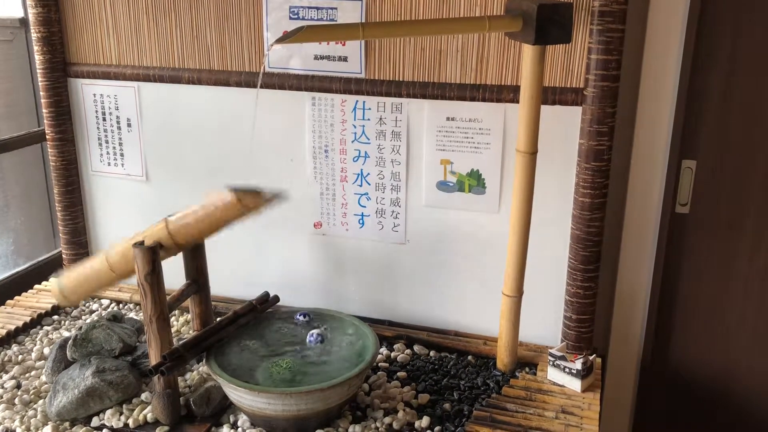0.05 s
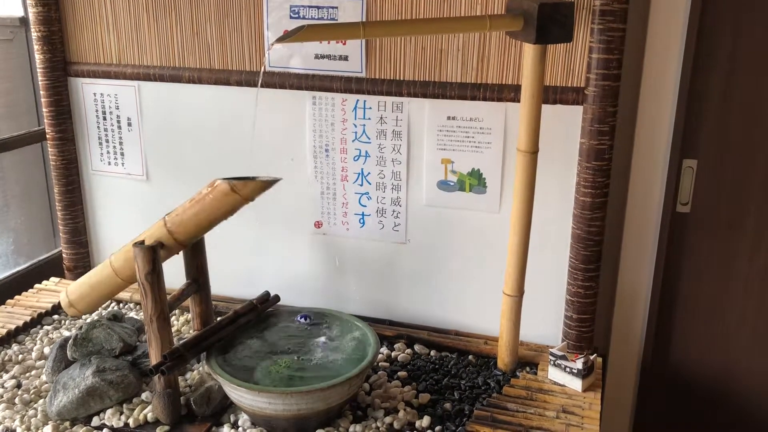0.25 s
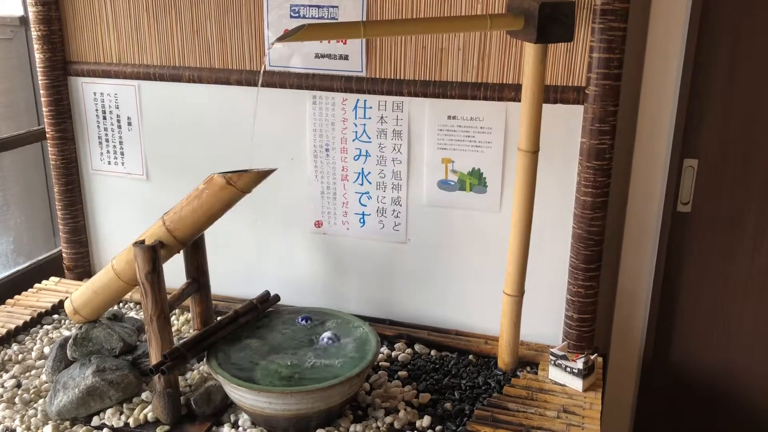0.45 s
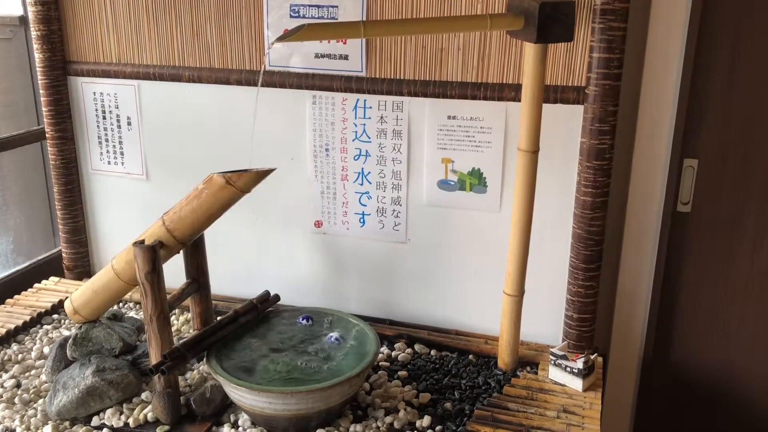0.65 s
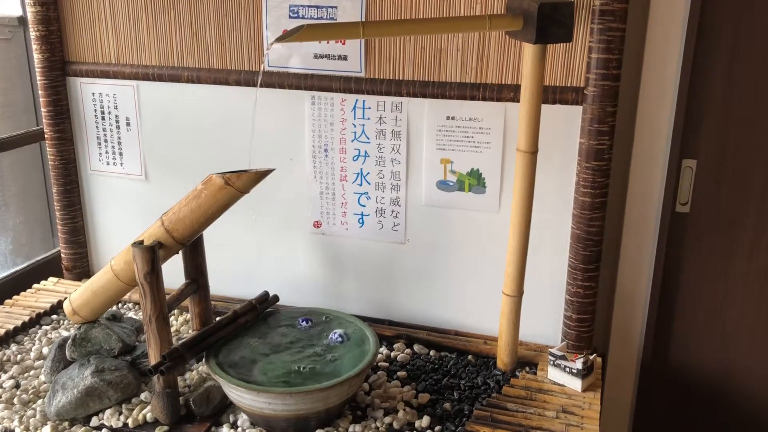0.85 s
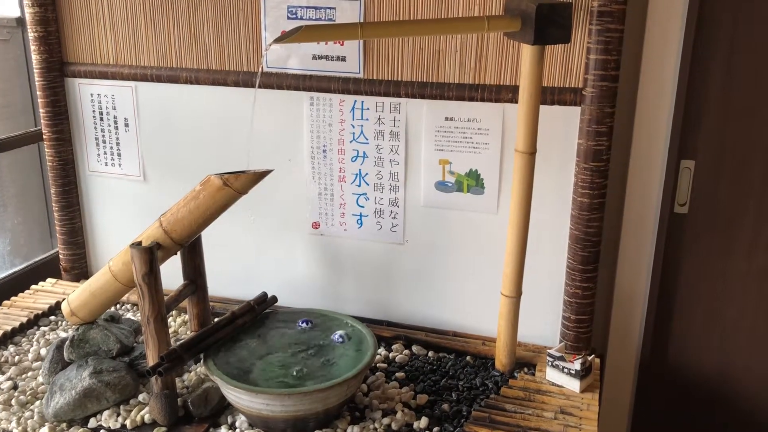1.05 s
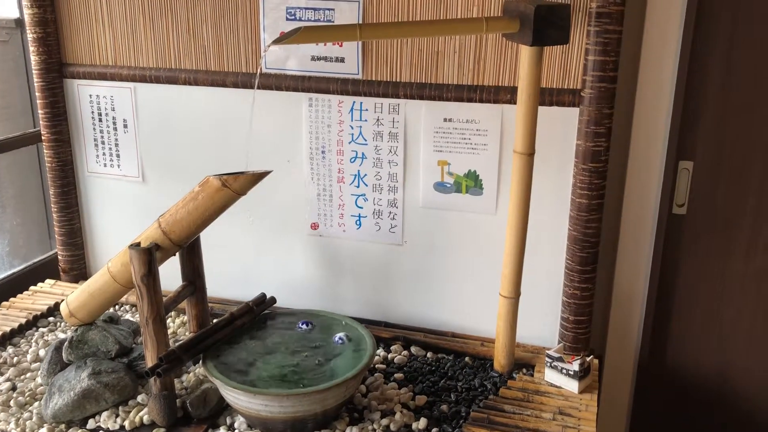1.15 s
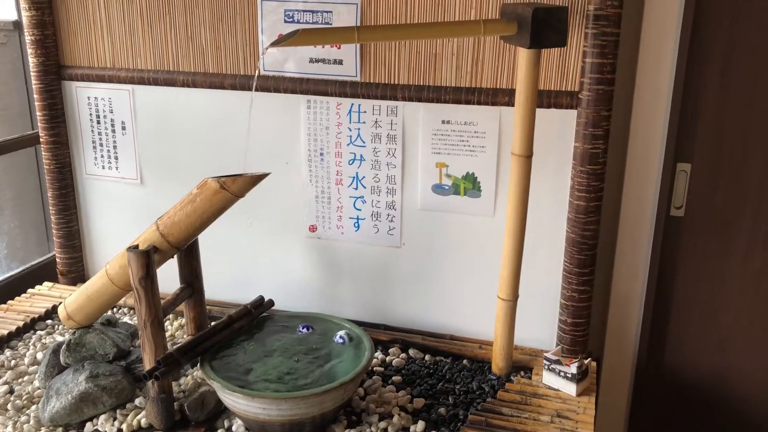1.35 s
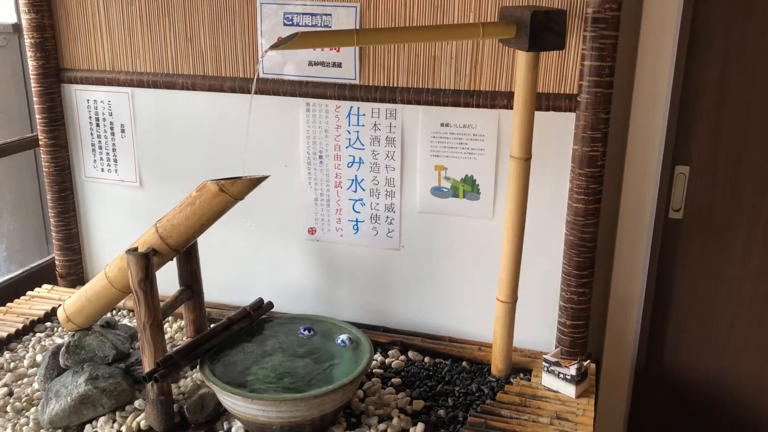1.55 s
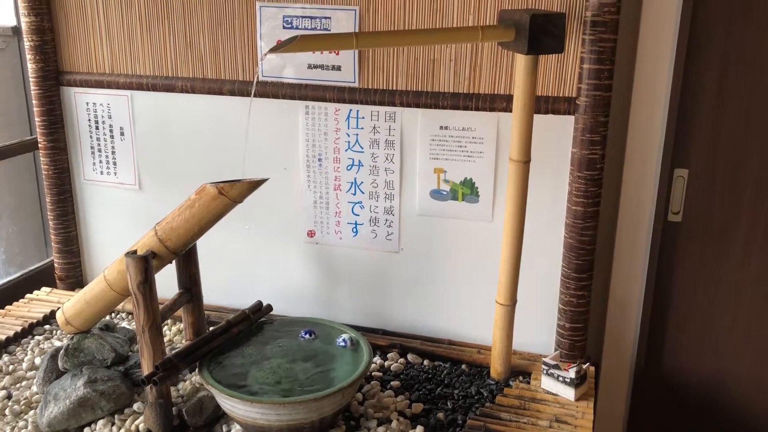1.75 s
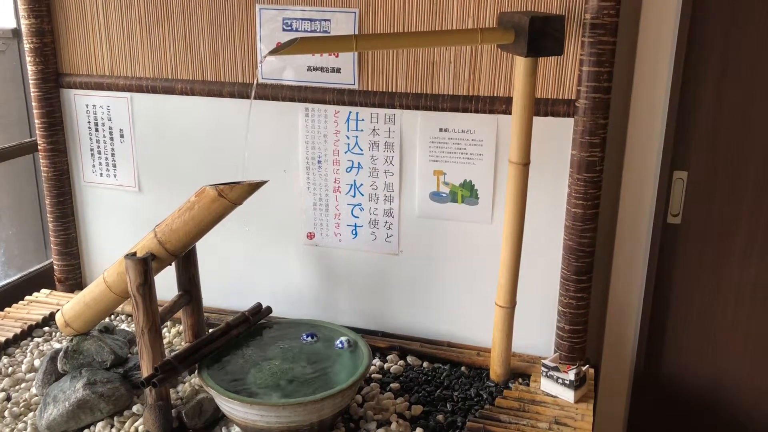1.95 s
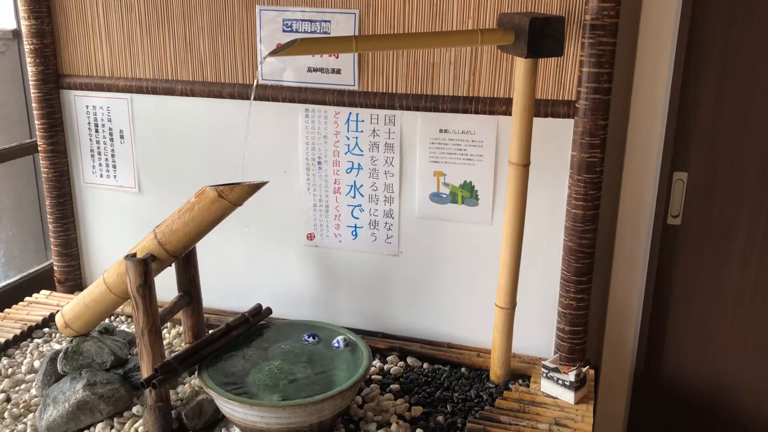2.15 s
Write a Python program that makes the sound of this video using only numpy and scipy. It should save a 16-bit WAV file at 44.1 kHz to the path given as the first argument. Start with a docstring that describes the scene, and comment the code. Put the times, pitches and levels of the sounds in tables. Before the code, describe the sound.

A bamboo water tipper swings back with a faint swish, knocks hard on stone and bounces once, softly. The hollow knock echoes briefly in a small porch, then a thin stream drips nearby over a low steady background.

```python
"""A few drips and a swish are heard first, as an emptied bamboo water tipper swings back. It knocks hard
on its stone and bounces once, softly. Each impact excites the damped modes of the tube and its air
column, a hollow ring that reverberates in a small hard-walled porch. A thin stream drips into tube and
basin, sounding through resonating bubbles, and late on one fat drop rings the bamboo.
A low steady background lies underneath; a limiter holds down the knock."""
import sys
import numpy as np
from scipy import signal
from scipy.fft import rfft, irfft
from scipy.io import wavfile
from scipy.ndimage import uniform_filter1d

SR = 44100
rng = np.random.default_rng(int(sys.argv[2]) if len(sys.argv) > 2 else 0)


def generate_wav(signal):
    """Clip the signal to [-1, 1] and save it as 16-bit WAV at the path in sys.argv[1]."""
    frames = np.transpose(np.atleast_2d(signal))
    scaled = np.clip(frames, -1, 1) * 32767
    pcm = np.round(scaled).astype(np.int16)
    wavfile.write(sys.argv[1], SR, pcm)


N = 97020

# spectrum of the steady background (frequency [Hz], relative spectral density [dB])
BACKGROUND_SPECTRUM = [(25, -20), (50, -12.5), (85, -3), (140, 3), (180, -7.5), (228, 5.5), (275, 0),
                       (350, -8), (650, -6.5), (850, -4), (915, 0.5), (990, -6.5), (1300, -9.5),
                       (2200, -14), (3200, -22.5), (5500, -34), (10000, -36.5), (16000, -35)]
# early reflections from the porch walls (delay [s], level [dB])
WALL_ECHOES = [(0.0204, -5), (0.0403, -6.5), (.0600, -7.5), (.0880, -7), (.108, -13)]
# reverberation time of the porch (frequency [Hz], t60 [s])
PORCH_DECAY = [(100, 0.9), (400, 0.56), (900, 0.66), (2000, 0.72), (4000, 0.65), (12000, 0.6)]
# fine spatter, dying down as the water settles (time [s], level [dB])
SPATTER_LEVELS = [(0, -47), (.2, -52), (.6, -58), (.85, -57.5), (1.1, -62.5), (1.5, -64), (2.2, -65)]
# distinct drops (time [s], level [dB], starting bubble frequency [Hz], t60 [s])
DROPS = [(.023, -43, 7250, 0.0086), (0.049, -39, 10000, 0.0095), (0.079, -33.5, 4160, 0.012),
         (.097, -33, 3890, 0.012), (0.699, -40, 1633, 0.048), (0.777, -35.5, 3800, 0.005),
         (0.7855, -34, 4720, 0.0072), (.802, -38.5, 3320, 0.017), (.874, -40, 2225, 0.046),
         (.885, -43.5, 2440, 0.032), (0.9, -41, 5900, 0.0037), (0.934, -41.5, 4200, 0.016),
         (0.949, -41, 4570, 0.013), (.982, -33.5, 3840, 0.0089), (.997, -41, 4180, 0.011),
         (1.052, -44, 5070, 0.027), (1.166, -57, 6100, 0.05), (1.186, -48, 5790, 0.042),
         (1.2267, -29, 5840, 0.0063), (1.230, -38, 2970, 0.012), (1.238, -52, 8160, 0.042),
         (1.340, -31, 3780, 0.0063), (1.359, -38.5, 4620, 0.019), (1.382, -45, 4480, .02),
         (1.7, -43, 3630, .005), (2.180, -42.5, 10870, 0.018)]
# modes of the bamboo under a fat drop (frequency [Hz], relative level [dB], t60 [s])
TAP_MODES = [(1421, -44, 0.27), (2024, -40, 0.092), (2095, -45, 0.14), (2509, -41.5, .08),
             (2708, -40.5, 0.068), (3090, -39.5, .05), (3467, -40.5, 0.044), (3700, -60, 0.072),
             (6030, -43.5, 0.014)]
# sloshing water and scuffing pivot (time [s], level [dB], centre [Hz], width [octaves], t60 [s])
SWISHES = [(0, -48, 2310, 1.08, 1), (.039, -42, 870, 1.9, 0.43), (0.153, -31, 3430, 0.83, 0.1),
           (0.188, -37.5, 1240, 1.35, 0.53)]
# spectrum of the woody crack (frequency [Hz], relative spectral density [dB])
CRACK_SPECTRUM = [(40, -46), (150, -18.5), (230, -17), (380, -13), (700, -4), (1200, -2.5), (2200, -5.5),
                  (2800, -12), (3900, -9), (5300, -23), (9000, -23.5), (16000, -16.5)]
# modes of the tube and its air column (frequency [Hz], relative level [dB], t60 [s], rise time [s])
TUBE_MODES = [(375.6, -26.5, 0.28, 0.0052), (387.3, -21.5, 0.27, 0.0053), (530, -24, 0.055, 0.0041),
              (659, -22.5, 0.12, 0.0017), (851, -15, 0.09, .006), (883.6, -1, 0.089, 0.0052),
              (956, -13, 0.074, 0.0013), (1096.6, -20, 0.11, 0.001), (1110.5, -17.5, 0.11, 0.0036),
              (1305, -20, 0.063, 0.0012), (1708, -33.5, 0.065, 0.00079), (2120, -25, 0.05, 0.0025),
              (3153, -29, 0.06, 0.00064), (3504, -19, 0.071, 0.0011), (6340, -33.5, 0.051, 0.0011)]
# blows on the stone (time [s], level [dB], cutoff [Hz], unfiltered contact [dB], send to porch [dB])
BLOWS = [(0.2075, 2.5, 8670, -13, 0), (0.4740, 3.5, 466, -25.5, -11)]


def amp(db):
    """Converts a level in decibels to an amplitude ratio."""
    return 10 ** (np.asarray(db) / 20)


def unit(x):
    """Normalises a signal to rms 1."""
    return x / np.sqrt(np.mean(x ** 2) + 1e-20)


def read(points, hz):
    """Interpolates a table on a logarithmic frequency axis."""
    f, value = np.transpose(points)
    return np.interp(np.log(hz + 1), np.log(f + 1), value)


def add(mix, s, sound):
    """Superposition: adds a sound to the mix from time s."""
    part = mix[max(round(s * SR), 0):][:len(sound)]
    part += sound[:len(part)]


def fade(t, t60):
    """Exponential damping: the level falls 60 dB in t60 seconds."""
    return np.exp(-np.log(1000) * t / t60)


def noise(db_of_hz, size):
    """Spectral shaping: white noise takes on a given colour, at rms 1."""
    gain = amp(db_of_hz(np.fft.rfftfreq(size, 1 / SR)))
    return unit(irfft(rfft(rng.standard_normal(size)) * gain, size))


def background(level_db=-47, patch_db=2):
    """Random modulation: a low steady wash wavers faintly in patches of time and frequency."""
    hz, _, spectra = signal.stft(rng.standard_normal(N), SR, nperseg=2048, noverlap=1536)
    patches = uniform_filter1d(rng.standard_normal(spectra.shape), size=14, axis=0)
    patches = unit(uniform_filter1d(patches, size=8, axis=1))
    spectra *= amp(read(BACKGROUND_SPECTRUM, hz)[:, None] + patch_db * patches)
    return amp(level_db) * unit(signal.istft(spectra, nperseg=2048, noverlap=1536)[1][:N])


def porch_response(build_s=0.022, tail_db=-0.5, echo_band_hz=(400, 2440)):
    """Reverberation: a few dull wall reflections, then a diffuse tail that decays band by band."""
    t, echoes = np.arange(SR) / SR, np.zeros(SR)
    hz, frame_s, spectra = signal.stft(rng.standard_normal(SR), SR, nperseg=512)
    spectra *= fade(frame_s, read(PORCH_DECAY, hz)[:, None])
    tail = signal.istft(spectra, SR, nperseg=512)[1][:SR]
    tail *= 1 - np.exp(-(t / build_s) ** 2)
    for delay, db in WALL_ECHOES:
        add(echoes, delay, amp([db]))
    echoes = signal.lfilter(*signal.butter(1, echo_band_hz, 'bandpass', fs=SR), echoes)
    return amp(tail_db) * tail / np.linalg.norm(tail) + echoes


def trickle(per_s=220, low_hz=2400, high_hz=14540, tilt_db=-0.5):
    """Shot noise: tiny droplets land at random moments, each a damped narrow band of noise."""
    out, t = np.zeros(N), np.arange(SR // 20) / SR
    lowpass = signal.butter(2, 700, fs=SR)
    for _ in range(int(per_s * N / SR)):
        when, size, pitch, length = rng.random(4)
        s, hz = when * N / SR, low_hz + (high_hz - low_hz) * pitch
        size_db = -1.86 * np.log(max(1 - size, 0.03))  # a few droplets stand out
        db = np.interp(s, *np.transpose(SPATTER_LEVELS)) + tilt_db * pitch + size_db
        flutter = unit(signal.lfilter(*lowpass, rng.random(len(t)) - 0.5))
        fizz = flutter * np.sin(2 * np.pi * hz * t)
        add(out, s, amp(db) * fizz * fade(t, t60=0.026 * (0.13 + length)))
    return out


def splat(hz, t60):
    """Liquid impact: a sudden wet burst of noise around one frequency."""
    t = np.arange(SR // 10) / SR
    band = noise(lambda f: -18.5 * np.log2((f + 1) / hz) ** 2, len(t))
    return band * fade(t, t60) * (1 - np.exp(-t / 0.00019))


def drips(pitch_rise=0.14, scatter_db=-1.5, splat_db=-9):
    """Bubble resonance: each drop gives a splat and a rising tone, blurred by surfaces close by."""
    out, t = np.zeros(N), np.arange(SR // 10) / SR
    for s, db, hz, t60 in DROPS:
        glide_hz = hz * (1 + pitch_rise * np.minimum(t / t60, 1))
        envelope = fade(t, t60) * (1 - np.exp(-t / 0.00087))
        bubble = envelope * np.sin(2 * np.pi * np.cumsum(glide_hz) / SR)
        scatter = rng.standard_normal(len(t)) * fade(t, t60=0.056)
        blur = signal.fftconvolve(bubble, scatter / np.linalg.norm(scatter))[:len(t)]
        drop = bubble + amp(scatter_db) * blur + amp(splat_db) * splat(hz, t60=0.012)
        add(out, s, amp(db) * drop)
    return out


def bamboo_tap(at_s=1.8985, ring_gain_db=1.5, splat_db=-43.5):
    """Impulse excitation: one fat drop slaps the bamboo, whose modes ring briefly."""
    out, t = np.zeros(N), np.arange(SR // 3) / SR
    ring = sum(amp(db) * fade(t, t60) * np.sin(2 * np.pi * hz * t) for hz, db, t60 in TAP_MODES)
    add(out, at_s, amp(ring_gain_db) * ring * (1 - np.exp(-t / 0.00088)))
    add(out, at_s, amp(splat_db) * splat(hz=2600, t60=0.11))
    return out


def swing(rise_s=0.0023):
    """Sloshing and friction: water and pivot give bands of noise as the tube swings back."""
    out, t = np.zeros(N), np.arange(SR // 2) / SR
    for s, db, hz, octaves, t60 in SWISHES:
        hiss = noise(lambda f: -28.4 * np.log10(1 + (np.log2((f + 1) / hz) / octaves) ** 2), len(t))
        add(out, s, amp(db) * hiss * fade(t, t60) * (1 - np.exp(-t / rise_s)))
    return out


def crack(energy_db=12, length_s=0.049, bass_lag_s=0.007, lag_corner_hz=794):
    """Dispersion: bending waves in the cane deliver the treble of a splintery burst before its bass."""
    t, hz = np.arange(SR) / SR, np.fft.rfftfreq(SR, 1 / SR)
    magnitude = amp(read(CRACK_SPECTRUM, hz))
    burst = rng.standard_normal(SR) * fade(t, length_s)
    for _ in range(8):  # impose the colour while keeping the burst short
        phase = np.angle(rfft(burst))
        burst = irfft(magnitude * np.exp(1j * phase), SR) * (t < length_s)
    group_delay_s = bass_lag_s / (1 + (hz / lag_corner_hz) ** 2)
    burst = irfft(rfft(burst) * np.exp(-2j * np.pi * np.cumsum(group_delay_s)), SR)  # 1 Hz bins
    return amp(energy_db) * burst / np.linalg.norm(burst)


def knock(cutoff_hz, unfiltered_db, snap_db=-4, snap_hz=1590, snap_s=0.00031):
    """Modal vibration: the tube snaps and cracks on the stone and rings; a soft blow has less treble."""
    t, ring = np.arange(SR) / SR, np.zeros(SR)
    for hz, db, t60, rise_s in TUBE_MODES:
        envelope = fade(t, t60) * (1 - np.exp(-(t / rise_s) ** 2))
        ring += amp(db) * envelope * np.sin(2 * np.pi * hz * t)
    snap = amp(snap_db) * np.exp(-t / snap_s) * np.cos(2 * np.pi * snap_hz * t)
    contact = crack() + snap
    dulled = signal.lfilter(*signal.butter(2, cutoff_hz, fs=SR), ring + contact)
    return dulled + amp(unfiltered_db) * contact


def scene(small_send_db=-8.5):
    """Superposition: knocks and small sounds, direct and reverberant, add to the background."""
    porch, wash = porch_response(), background()
    knocks, to_porch = np.zeros(N), np.zeros(N)
    for s, db, cutoff_hz, unfiltered_db, send_db in BLOWS:
        blow = amp(db) * knock(cutoff_hz, unfiltered_db)
        add(knocks, s, blow)
        add(to_porch, s, amp(send_db) * blow)
    small_sounds = drips() + swing() + bamboo_tap() + trickle()
    to_porch += amp(small_send_db) * small_sounds
    reverberation = signal.fftconvolve(to_porch, porch)[:N]
    return (wash + small_sounds + knocks + reverberation)[None]


def record(dry, threshold_db=-8.5, share=0.6, fall_db_per_s=126, edge_hz=15850):
    """Limiting: a share of the level above a threshold is removed; clipping and a low-pass follow."""
    power_db = 10 * np.log10(abs(uniform_filter1d(dry[0] ** 2, size=200)) + 1e-12)
    fall_db = np.arange(N) * fall_db_per_s / SR
    peak_db = np.maximum.accumulate(power_db + fall_db) - fall_db  # jumps up, then sinks steadily
    excess_db = np.maximum(peak_db - threshold_db, 0)
    reduction_db = share * uniform_filter1d(excess_db, size=100)
    held = np.clip(dry / amp(reduction_db), -1, 1)
    lowpass = signal.firwin(511, edge_hz, window=("kaiser", 9), fs=SR)
    return signal.oaconvolve(held, lowpass[None], "same")


dry = scene()
out = record(dry)
generate_wav(out)
```